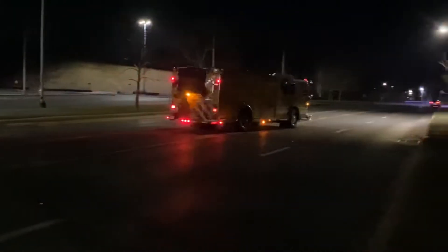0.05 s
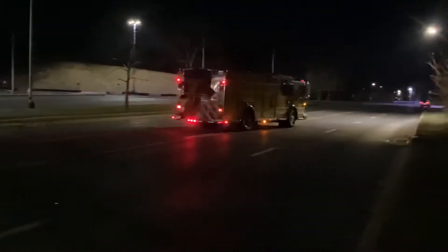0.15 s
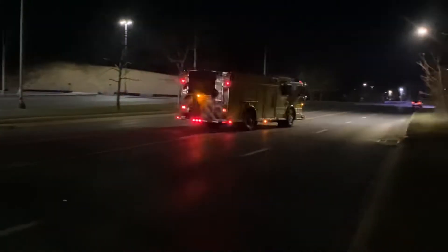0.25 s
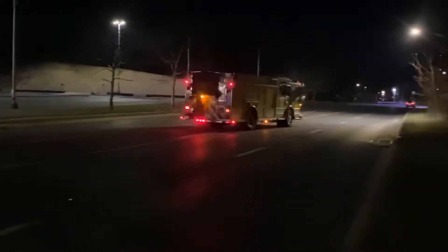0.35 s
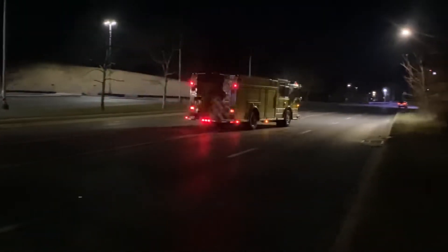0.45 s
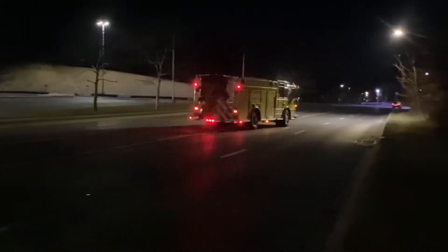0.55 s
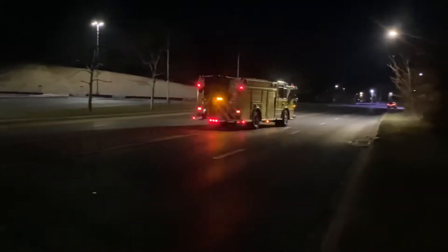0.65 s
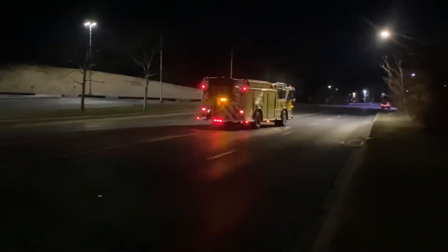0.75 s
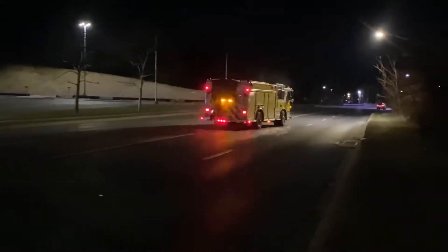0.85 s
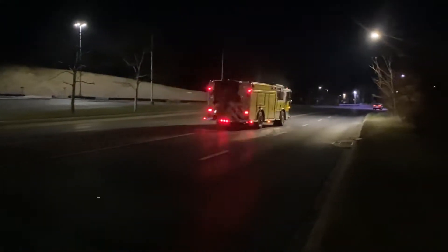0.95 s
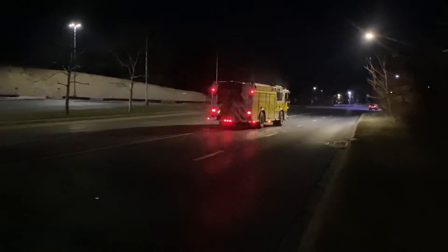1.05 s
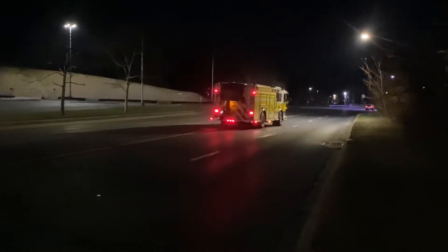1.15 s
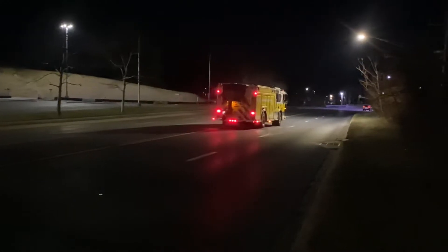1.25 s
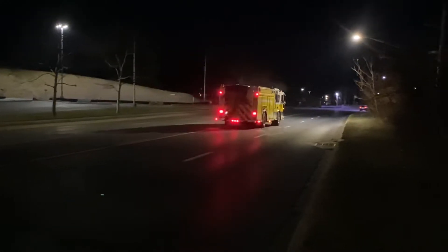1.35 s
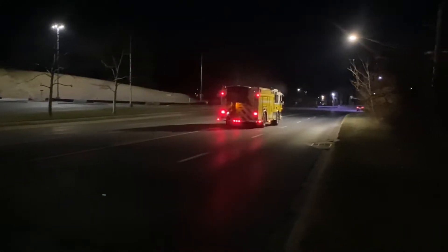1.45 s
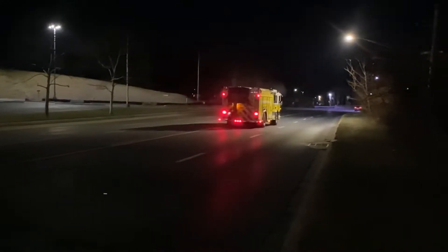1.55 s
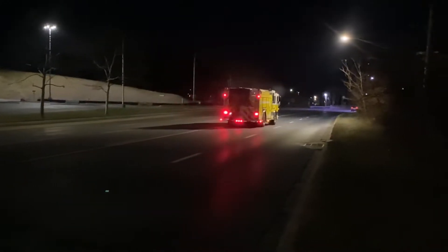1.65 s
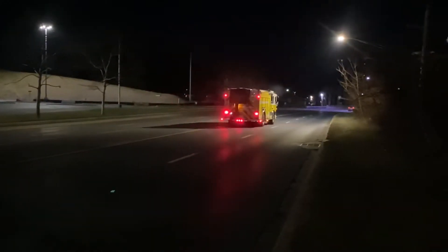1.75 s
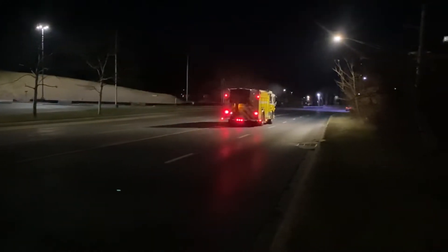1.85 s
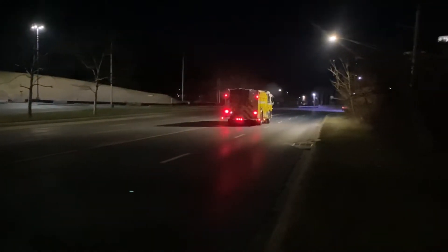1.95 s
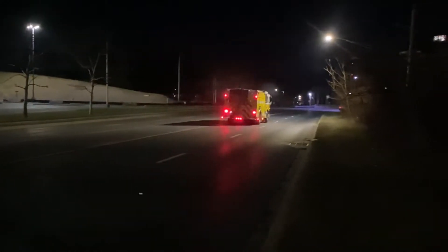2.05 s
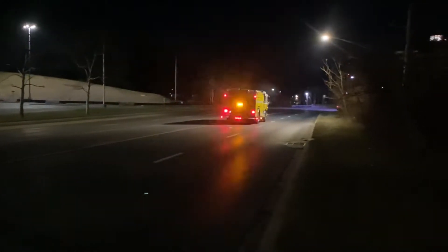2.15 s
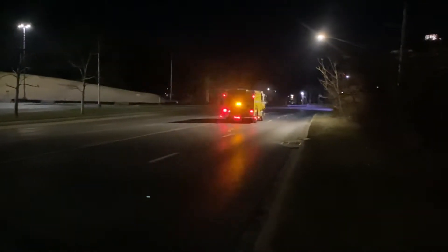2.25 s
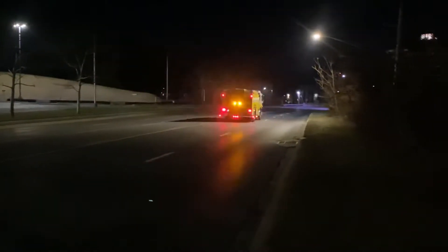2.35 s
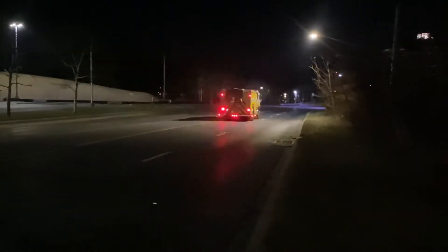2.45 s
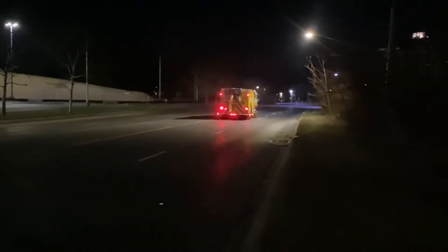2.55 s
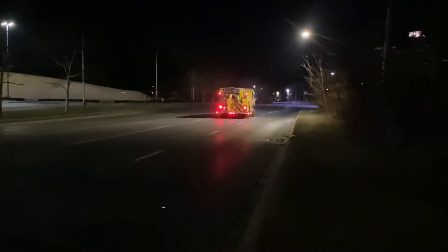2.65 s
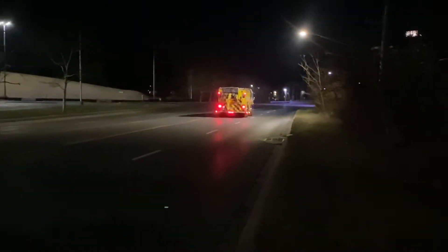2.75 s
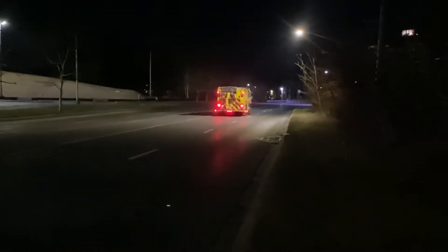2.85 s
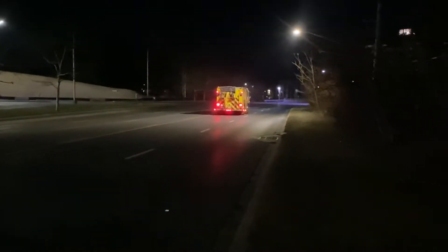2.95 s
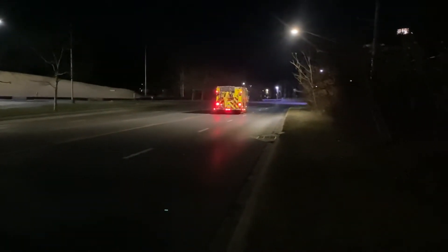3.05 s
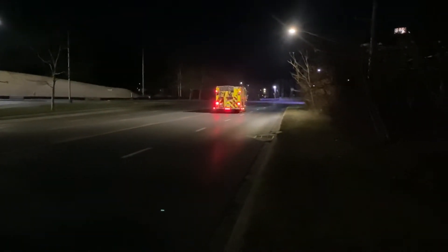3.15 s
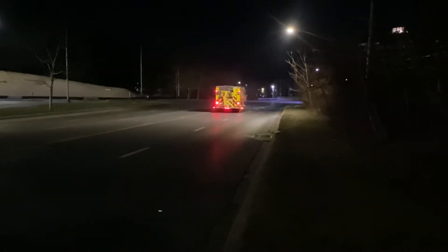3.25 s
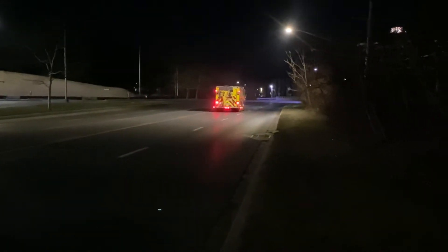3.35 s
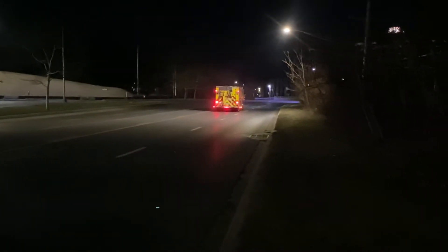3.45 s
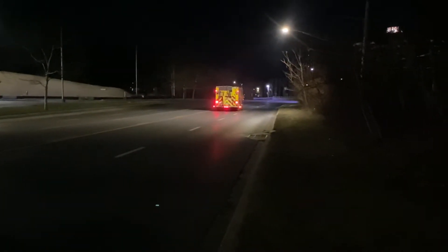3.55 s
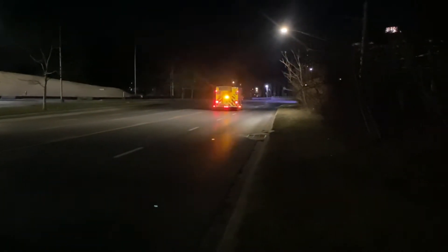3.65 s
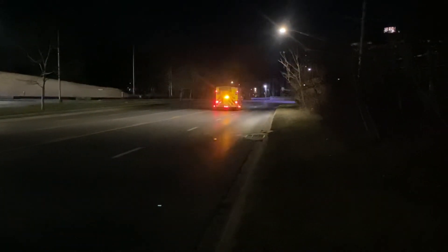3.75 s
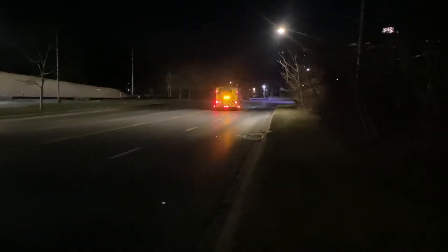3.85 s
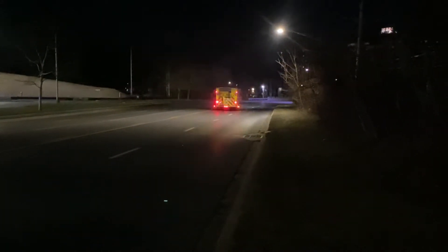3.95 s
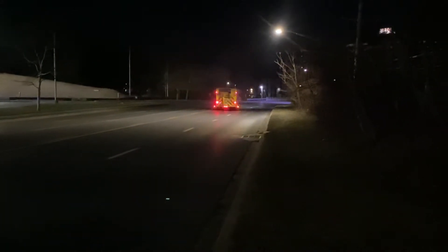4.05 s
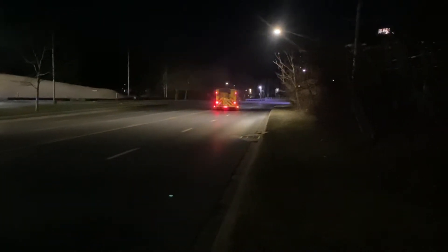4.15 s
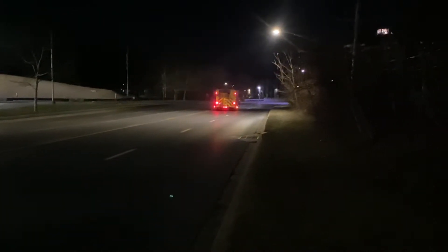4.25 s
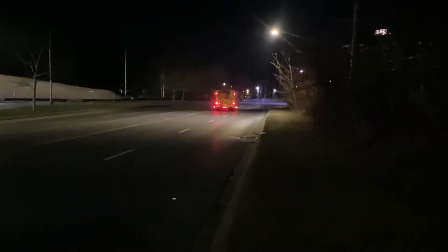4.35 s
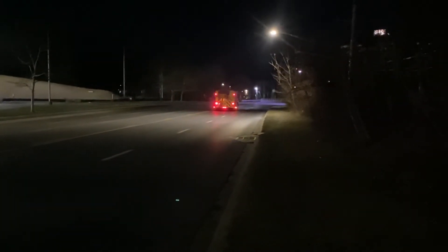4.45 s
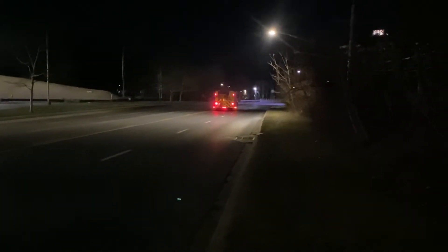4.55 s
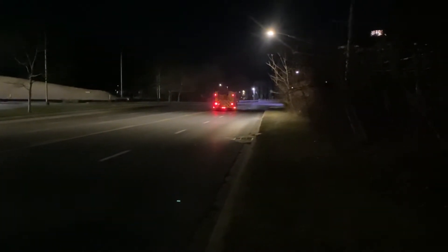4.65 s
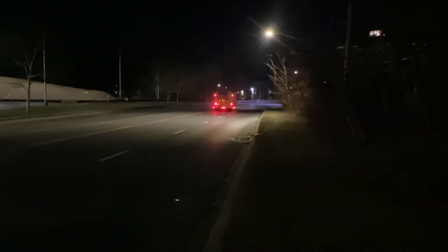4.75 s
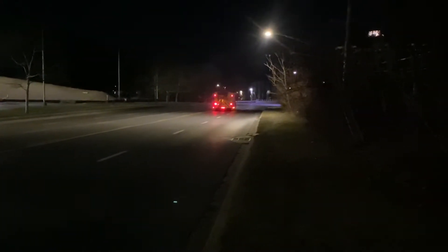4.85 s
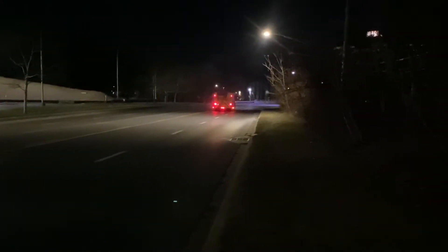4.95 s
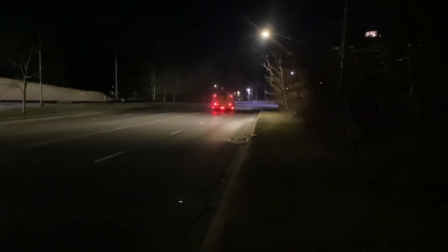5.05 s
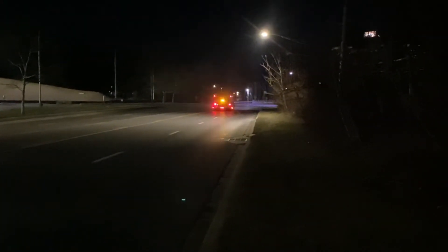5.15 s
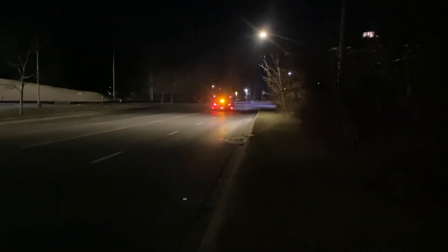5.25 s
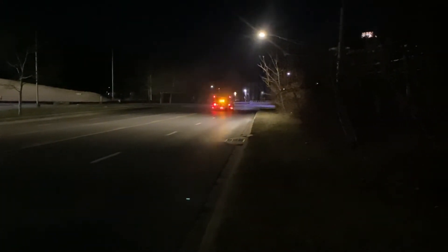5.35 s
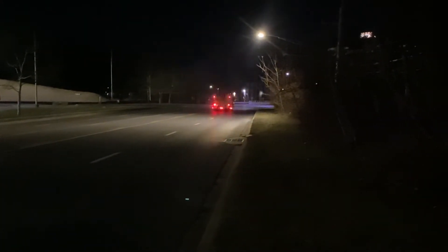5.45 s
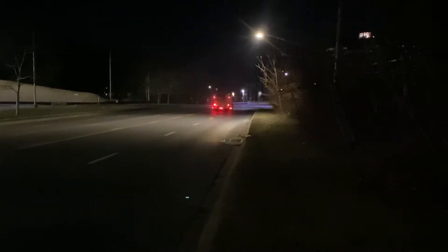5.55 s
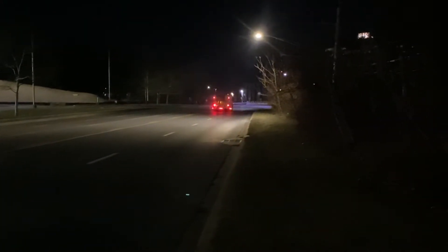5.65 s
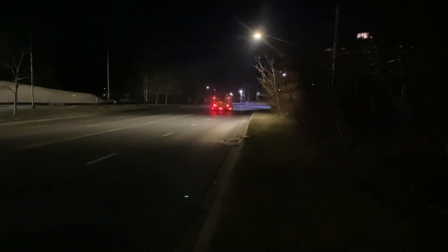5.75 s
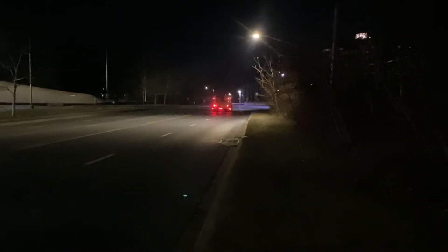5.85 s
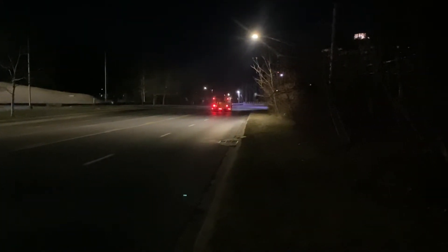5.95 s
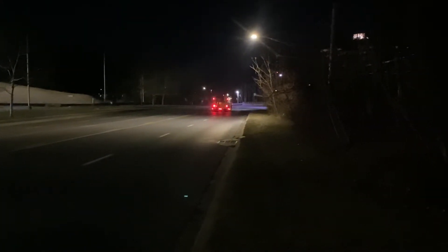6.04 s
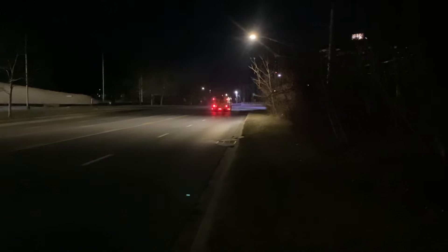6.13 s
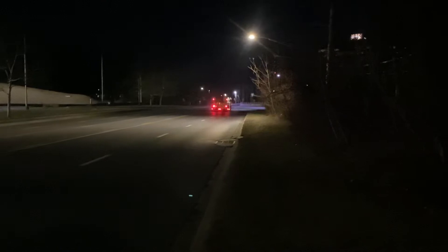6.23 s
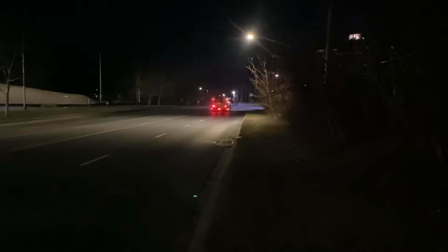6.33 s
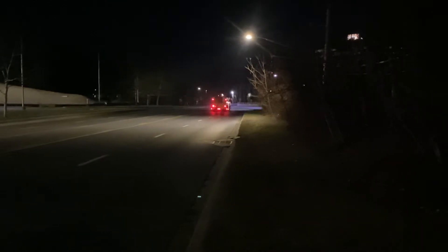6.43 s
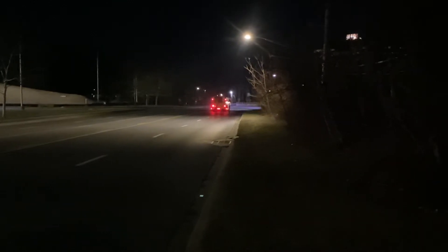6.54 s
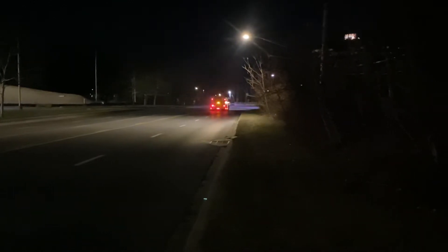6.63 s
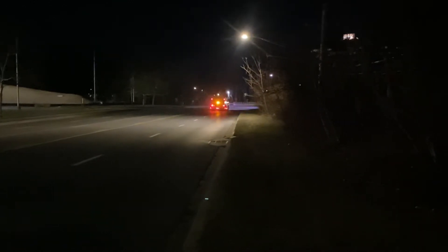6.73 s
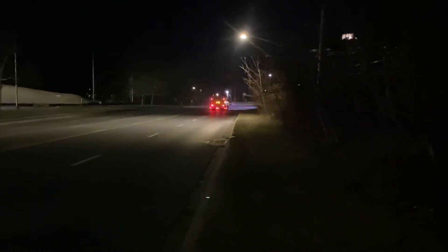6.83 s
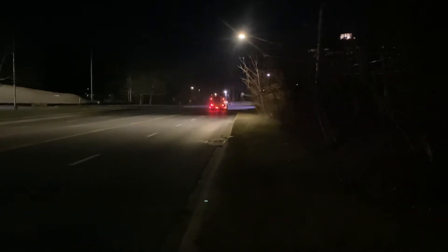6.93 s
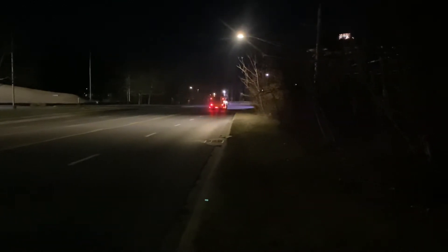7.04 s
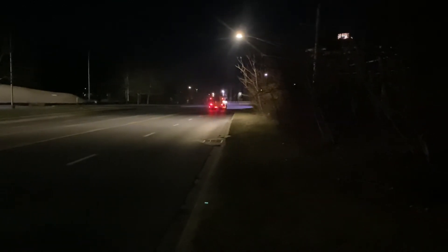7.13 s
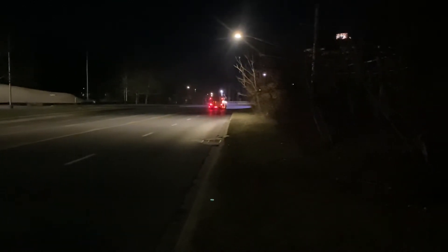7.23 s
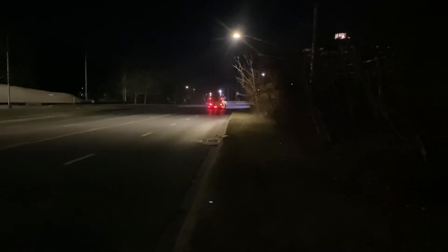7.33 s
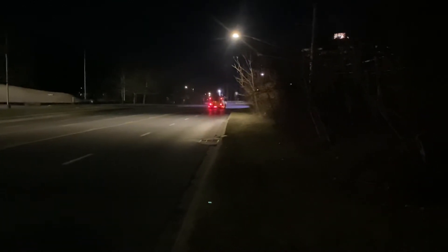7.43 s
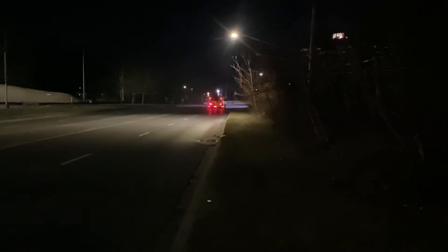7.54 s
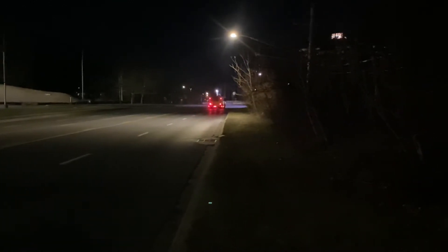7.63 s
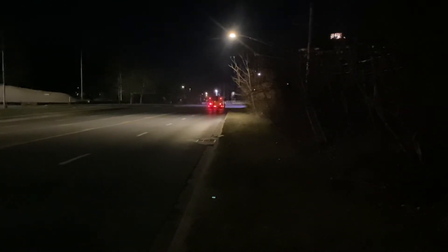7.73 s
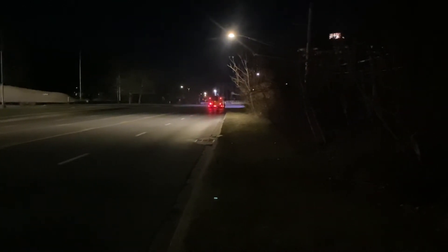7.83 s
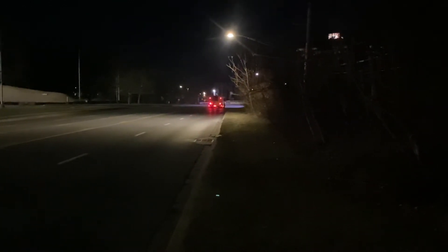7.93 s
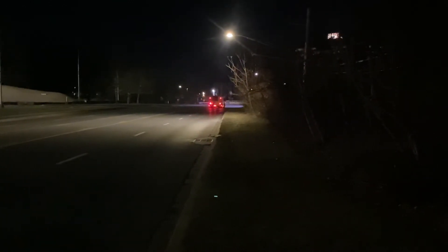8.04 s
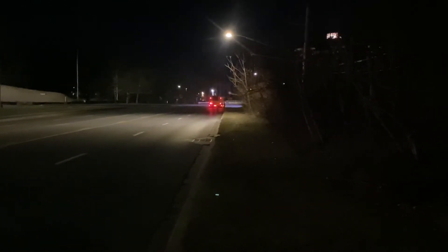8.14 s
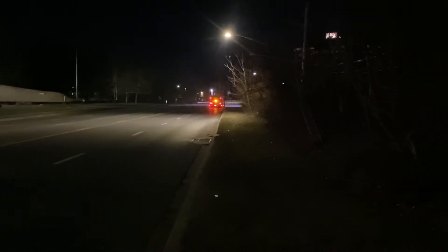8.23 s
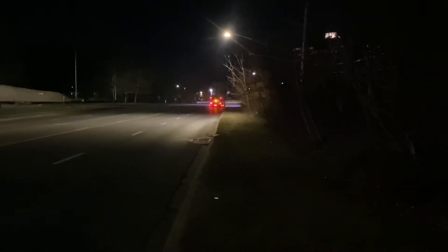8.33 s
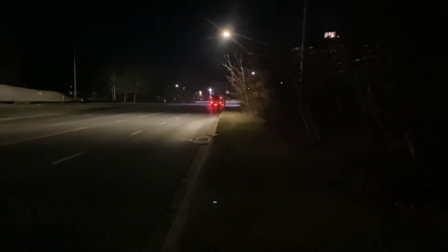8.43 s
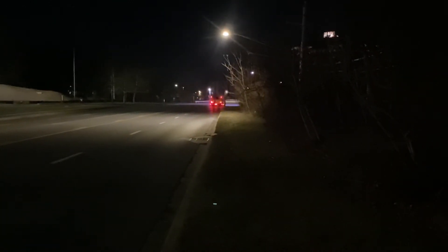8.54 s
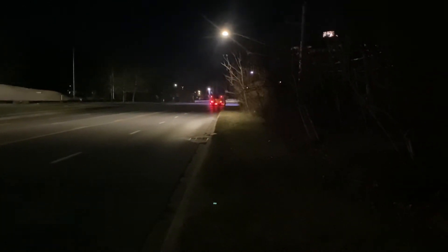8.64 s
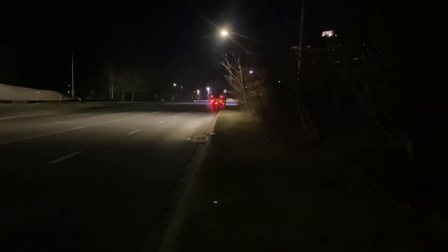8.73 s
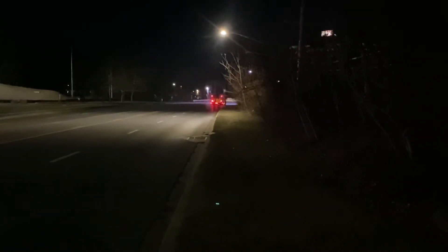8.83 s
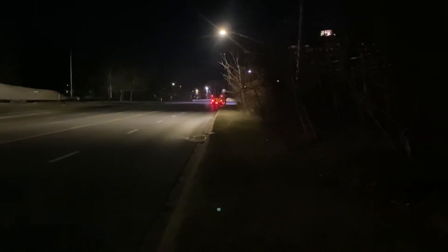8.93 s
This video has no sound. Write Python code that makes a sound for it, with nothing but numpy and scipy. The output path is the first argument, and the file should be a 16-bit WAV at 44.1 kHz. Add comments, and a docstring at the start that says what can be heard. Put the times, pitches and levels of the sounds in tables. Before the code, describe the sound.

Loud six-cylinder diesel exhaust accelerates away from a roadside listener, pitch dropping at two gear changes, thinning to faint rumble over quiet town noise.

```python
"""A six-cylinder diesel truck pulls away along an open road at night, changing gear twice.
Its exhaust sums a boom at the firing rate, growling cycle harmonics and filtered noise pulses (bark, rasp).
Reflections comb the pulses, and peaks beyond full scale clip. Noise bursts crack from the tail pipe;
narrow-band noise gives axle and turbocharger whines. Shaped noise gives town, hiss and a far car;
a sine hum comes in spells, and small nearby ticks are damped rings with noise."""
import sys
import numpy as np
from scipy import signal
from scipy.fft import rfft, irfft, next_fast_len
from scipy.io import wavfile
from scipy.ndimage import uniform_filter1d

SR = 44100
rng = np.random.default_rng(int(sys.argv[2]) if len(sys.argv) > 2 else 0)


def to_wav(sig):
    """Store sig (one row per channel, or 1-D mono) as 16-bit WAV at the path in sys.argv[1].

    Samples outside -1..1 are clipped; the rate is SR.
    """
    pcm = np.clip(np.atleast_2d(sig), -1, 1) * 32767
    pcm = np.round(pcm).astype(np.int16)
    wavfile.write(sys.argv[1], SR, pcm.T)  # frames by channels


N = 396459
T = np.arange(N) / SR


def gain_of(db):
    """Decibel law: 20 dB is a factor of ten in amplitude."""
    return 10 ** (np.asarray(db) / 20)


def evened(x):
    """Normalisation to unit rms over the whole length."""
    return x / np.sqrt(np.mean(x ** 2) + 1e-20)


def steady(x):
    """Envelope normalisation: divides out the slow level, so that a curve can set it."""
    return x / np.sqrt(uniform_filter1d(x ** 2, size=SR // 3, mode="reflect") + 1e-20)


def curves(rows):
    """Linear interpolation in time of every column of a table."""
    s, *columns = np.transpose(rows)
    return [np.interp(T, s, column) for column in columns]


def wander(per_s):
    """Random modulation: normal draws of unit spread, per_s of them a second, joined by lines."""
    points = rng.standard_normal(round(per_s * N / SR) + 2)
    return np.interp(T * per_s, np.arange(len(points)), points)


def colour(x, points):
    """Zero-phase filtering: the gain follows (f/Hz, level/dB) points on a log-frequency axis."""
    f, db = np.transpose(points)
    size = next_fast_len(N + SR)
    hz = np.fft.rfftfreq(size, 1 / SR)
    response_db = np.interp(np.log(hz + 1), np.log(f + 1), db, -120, -120)
    return irfft(rfft(x, size) * gain_of(response_db), size)[:N]


def resonate(x, hz, width):
    """Heterodyne resonator: shifts the curve hz down to zero, smooths, and shifts back."""
    turn = np.exp(2j * np.pi * np.cumsum(hz * np.ones(N)) / SR)
    r = np.exp(-np.pi * width / SR)
    smooth = signal.lfilter([1 - r], [1, -r], x / turn)
    return 2 * (turn * smooth).real


# engine speed before the flywheel rounds it: [t/s, firing rate f/Hz]
ENGINE_SPEED = [(0.0, 101.39), (0.38, 97.21), (0.76, 84.84), (1.01, 81.66), (1.33, 85.17), (2.54, 94.8),
                (3.05, 98.41), (3.3, 97.03), (3.8, 81.9), (4.05, 79.39), (5.16, 84.77), (6.3, 89.44),
                (6.6, 88.71), (6.86, 90.63), (7.26, 86.56), (8.1, 89.44), (8.78, 83.87), (8.99, 83.88)]
INERTIA_S = .15  # the flywheel rounds every change of speed


def speed():
    """Rotational inertia: firings per second, smoothed by a moving average."""
    return uniform_filter1d(curves(ENGINE_SPEED)[0], size=round(INERTIA_S * SR), mode="nearest")


FIRST_FIRING_S = .018


def turns():
    """Phase as the integral of frequency: firing steps counted from the first strong firing."""
    done = np.cumsum(speed()) / SR
    return done - np.interp(FIRST_FIRING_S, T, done)


# direction the tail pipe is heard from: [t/s, share (1 alongside, 0 behind)]
VIEWPOINT = [(.3, 1), (.75, 0)]


def alongside():
    """Source directivity: share of the sound taken from alongside rather than behind."""
    return curves(VIEWPOINT)[0]


# one row a cylinder: [place in the cycle/firing steps, growl level/dB, bark level/dB]
CYLINDER_FIRINGS = [(.24, 0, 0), (1.27, -1, -3.5), (2.3, -5, -7), (2.99, -6, -5), (4.25, -6, -7.5),
                    (4.99, -7, -5.5)]


def firings(jitter_s, spread_db):
    """Impulse train: one click a cylinder and cycle, each a little off in time and size."""
    place, _, bark_db = np.transpose(CYLINDER_FIRINGS)
    cycles = np.arange(-1, 140)[:, None]
    luck = rng.standard_normal((cycles.size * 6, 2))
    steps = (6 * cycles + place).ravel()
    at = (np.interp(steps, turns(), T, -1, -1) + jitter_s * luck[:, 0]) * SR
    size = gain_of(np.tile(bark_db, cycles.size) + spread_db * luck[:, 1])
    heard = (at > 0) & (at < N - 2)
    at, size = at[heard], size[heard]
    # a click between two samples is shared by both
    whole, part, out = at.astype(int), at % 1, np.zeros(N)
    np.add.at(out, whole, size * (1 - part))
    np.add.at(out, whole + 1, size * part)
    return out


def puffs(clicks, decay_s, base):
    """Turbulence as modulated noise: it flares at each firing and decays exponentially."""
    r = np.exp(-1 / (decay_s * SR))
    flare = evened(signal.lfilter([1], [1, -r], clicks))
    return evened((base + flare) * rng.standard_normal(N))


# reflections off chassis and kerb: [delay t/s, strength/1 (full alongside)]
NEAR_REFLECTIONS = [(.0027, 0.19), (.0049, 0.044), (.0083, 0.34), (.0136, -0.11)]
BOUNCE_BEHIND = .4  # share of the reflections left once the truck has turned its back


def bounce(x):
    """Early reflections: each pulse returns a few times from nearby surfaces."""
    share = BOUNCE_BEHIND + (1 - BOUNCE_BEHIND) * alongside()
    return x + share * sum(strength * np.roll(x, round(s * SR)) for s, strength in NEAR_REFLECTIONS)


# road echo, its paths growing alike with distance:
# [t/s, comb spacing f/Hz, strength on bark/1, strength on rasp and cracks/1]
ROAD_COMB = [(0, 750, .75, .45), (.4, 890, .6, .4), (1, 1040, .2, .4), (1.5, 1210, .15, .6),
             (1.9, 1330, .15, .65), (2.3, 1420, .1, .6), (2.9, 1550, .1, .4), (3.3, 1700, .1, .45),
             (4, 1900, 0, .15), (9, 3400, 0, 0)]


def road_echo(x, column):
    """Comb interference: adds the copy that bounces off the road; its rough face scatters treble."""
    spacing_hz, *strength = curves(ROAD_COMB)
    dull = signal.filtfilt(*signal.butter(1, 6000, fs=SR), x)
    delayed = np.interp(np.arange(N) - SR / spacing_hz, np.arange(N), dull)
    return x + strength[column] * delayed


def shimmer(x, depth_db):
    """Scattering by moving air: random patches of the spectrum rise and drop."""
    z = signal.stft(x, nperseg=256)[2]
    patches = uniform_filter1d(rng.standard_normal(z.shape), size=4, axis=0)
    patches = evened(uniform_filter1d(patches, size=36, axis=1))
    return signal.istft(z * gain_of(depth_db * patches), nperseg=256)[1][:N]


def boom():
    """Fundamental of the firing rate: one sinusoid locked to the engine's phase."""
    return np.sqrt(2) * np.cos(2 * np.pi * (turns() + .06))


# strength of a cycle multiple by its remainder, 0 to 5 sixths of the firing rate: [level/dB]
ORDER_LEVELS = [4.5, -9.5, -5, -1.5, -1.5, -4]
# silencer colour on the growl lines heard alongside: [f/Hz, level/dB]
SILENCER_ALONGSIDE = [(40, -39), (50, -26), (66, -15.5), (90, -21), (148, -5.5), (246, -2.5), (328, -9.5),
                      (394, -21), (443, -33), (525, -16), (656, -35), (750, -39)]
# silencer colour on the growl lines heard from behind: [f/Hz, level/dB]
SILENCER_BEHIND = [(44, -41), (58, -13.5), (75, -24.5), (100, -8), (135, -15), (200, -10.5), (228, -9.5),
                   (252, -5.5), (295, -11), (345, -8), (400, -13), (465, -21), (580, -20.5), (700, -43)]
HALFWAY_DB_PER_ORDER, HALFWAY_PIVOT = -.45, 21  # the multiples halfway between fade as they climb


def growl_lines():
    """Fourier series of the engine cycle: uneven firings set how the lines line up into pulses."""
    place, db, _ = np.transpose(CYLINDER_FIRINGS)
    count = len(place)
    cycle, beside, out = 2 * np.pi * (turns() - .07) / 6, alongside(), np.zeros(N)
    for order in range(3, 41):
        if order == count:
            continue  # the boom plays the firing rate itself
        pulses = gain_of(db) * np.exp(-2j * np.pi * order * place / count)
        start = np.angle(np.sum(pulses)) + .6
        level_db = ORDER_LEVELS[order % count] + 2.1 * wander(per_s=4)
        if order % count == count / 2:
            level_db += HALFWAY_DB_PER_ORDER * (order - HALFWAY_PIVOT)
        phase = order * cycle + start + .01 * order * wander(per_s=9)
        out += gain_of(level_db) * np.cos(phase)
    near, far = colour(out, SILENCER_ALONGSIDE), colour(out, SILENCER_BEHIND)
    return steady(beside * near + (1 - beside) * far)


# colour of the turbulence in the silencer: [f/Hz, relative level/dB]
SILENCER_TURBULENCE = [(26, -35), (45, -23.5), (75, -18.5), (129, -6), (232, 1.5), (284, -8.5), (328, 1),
                       (520, -9), (680, -43.5), (1140, -120)]


def growl(clicks):
    """Harmonic and turbulent sound superposed: cycle lines with a share of silencer noise."""
    turbulence = colour(puffs(clicks, .005, 1.3), SILENCER_TURBULENCE)
    return growl_lines() + .3 * evened(turbulence)


# colour of the tail pipe: [f/Hz, relative level/dB]
TAIL_PIPE = [(200, -20), (330, -3.5), (480, 7), (620, 7.5), (800, 4.5), (1000, 2), (1250, -8.5),
             (1600, -20.5), (2500, -36)]


def bark(clicks, rough):
    """Pipe-filtered pulses: clean clicks and turbulence mix at constant power, then reflect."""
    pulses = rough * puffs(clicks, .006, 2.2) + np.sqrt(1 - rough ** 2) * evened(clicks)
    return steady(road_echo(bounce(colour(pulses, TAIL_PIPE)), column=0))


# colour of the gas jet: [f/Hz, relative level/dB]
GAS_JET = [(590, -26), (1000, -4), (1400, -8), (2250, -15), (3210, -24.5), (3820, -25), (5890, -31.5),
           (6800, -36.5), (8910, -51), (10000, -53.5), (13000, -76.5), (22000, -120)]


def rasp(clicks, rough):
    """Jet noise: broadband turbulence pulsed by the firings, combed by the road and the air."""
    jet = puffs(clicks, .002, .6 + 3 * rough) + .5 * (1 - rough) * evened(clicks)
    return steady(shimmer(road_echo(colour(jet, GAS_JET), column=1), depth_db=2.5))


# reference for all exhaust layers as the truck draws away and finally eases off: [t/s, level/dB]
EXHAUST_LEVEL = [(0, -16), (.3, -15), (.6, -15.5), (1, -17), (1.45, -17), (2, -20), (2.7, -22), (3.3, -24),
                 (3.8, -25), (4.2, -27.5), (5.1, -27.5), (5.9, -31), (6.4, -34), (6.8, -41), (7.2, -46),
                 (8, -53.5), (8.6, -51), (8.99, -68)]
# share of turbulence in the pulses, before the swells clear them: [t/s, share/1]
ROUGHNESS = [(0, 0.5), (.3, 0.57), (.55, 1), (2.4, 0.89), (3.3, 0.69), (4.2, 0.99), (6.2, 1), (7, 0.9),
             (8.99, 0.6)]
# moments when the jet swells and the pulses clear, or (negative) the reverse:
# [t/s, rasp level/dB, half length t/s]
JET_SWELLS = [(0.193, 8, 0.2), (0.951, 4.5, 0.13), (1.44, 3.5, 0.065), (1.675, 1.5, .1), (2.095, 3.5, 0.12),
              (1.913, 4.5, 0.12), (2.328, 4.5, 0.075), (2.745, 2, 0.15), (3.08, -1, 0.09),
              (3.37, 0.5, 0.14), (3.738, 3, 0.29), (4.945, 0.5, .14), (6.3, -4, 0.058)]
# far down the road the boom swells and drops against the rest: [t/s, level/dB]
DISTANT_BOOM = [(5.4, 0), (6.1, 5), (6.45, 12), (6.75, 14), (6.95, 7), (7.22, 15), (7.4, -9), (7.75, -2),
                (8, 10), (8.4, 17), (8.62, 22), (8.8, 13), (8.99, 16)]
REV_HZ = 90  # firing rate at which BARK_DB and RASP_DB hold
BARK_DB, BARK_DB_PER_HZ, BARK_DB_PER_S = -8, 0.3949, 0.76  # higher revs bark harder
RASP_DB, RASP_DB_PER_HZ, RASP_DB_PER_S = -15.5, 0.2451, -0.35  # the air dulls the jet with distance
ALONGSIDE_BOOM_DB, ALONGSIDE_BARK_DB, ALONGSIDE_RASP_DB = 3, 5, -1  # facing the open tail pipe
CLEARING_PER_DB, SWELL_ON_BARK = 0.04, 0.38
# the boom blooms as the firing rate nears the pipe's note
PIPE_HZ, PIPE_WIDTH_HZ, BOOM_DB, BLOOM_DB = 98, 7.5, -12, 10.5
# the driver eases off and the pipe quietens
EASE_S, EASE_LENGTH_S = 6.6, 2
EASED_GROWL_DB, EASED_BARK_DB, EASED_RASP_DB = -4, -1.5, -12


def controls():
    """Radiated level by load, resonance and directivity: four layer levels in dB, and roughness."""
    level_db, rate, beside = curves(EXHAUST_LEVEL)[0], speed(), alongside()
    revs = rate - REV_HZ
    eased = np.clip((T - EASE_S) / EASE_LENGTH_S, 0, 1)
    swell_db = sum(db * np.clip(1 - abs(T - s) / half, 0, 1) for s, db, half in JET_SWELLS)

    bloom_db = BLOOM_DB * np.exp(-((rate - PIPE_HZ) / PIPE_WIDTH_HZ) ** 2)
    boom_db = BOOM_DB + bloom_db + ALONGSIDE_BOOM_DB * beside + curves(DISTANT_BOOM)[0]
    growl_db = EASED_GROWL_DB * eased
    bark_db = BARK_DB + BARK_DB_PER_HZ * revs + BARK_DB_PER_S * T
    bark_db += ALONGSIDE_BARK_DB * beside + SWELL_ON_BARK * swell_db + EASED_BARK_DB * eased
    rasp_db = RASP_DB + RASP_DB_PER_HZ * revs + RASP_DB_PER_S * T
    rasp_db += ALONGSIDE_RASP_DB * beside + swell_db + EASED_RASP_DB * eased

    rough = np.clip(curves(ROUGHNESS)[0] - CLEARING_PER_DB * swell_db, 0, 1)
    return level_db + boom_db, level_db + growl_db, level_db + bark_db, level_db + rasp_db, rough


def exhaust():
    """Superposition of boom, growl, bark and rasp; one train of firings drives the noisy layers."""
    boom_db, growl_db, bark_db, rasp_db, rough = controls()
    clicks = firings(jitter_s=.00012, spread_db=1.3)
    low = gain_of(boom_db) * boom() + gain_of(growl_db) * growl(clicks)
    high = gain_of(bark_db) * bark(clicks, rough) + gain_of(rasp_db) * rasp(clicks, rough)
    return low + high


# turbocharger whistle: [t/s, f/Hz, mean level/dB]
TURBO_WHISTLE = [(0, 10300, -92), (.6, 10000, -84), (1, 9750, -80), (1.5, 9750, -81), (2.3, 10300, -86),
                 (3.2, 10900, -93), (4, 10900, -100)]


def turbo():
    """Narrow-band noise: two resonators in series give a fuzzy whistle with a wandering level."""
    hz, db = curves(TURBO_WHISTLE)
    whistle = resonate(resonate(rng.standard_normal(N), hz, 300), hz, 300)
    return gain_of(db + 4 * wander(per_s=9.1)) * evened(whistle)


# colour of distant traffic and hiss: [f/Hz, relative level/dB]
TOWN_COLOUR = [(12, -36), (20, -6.5), (77, 0), (146, -6.5), (198, -3), (337, -11.5), (485, -12.5),
               (873, -11), (1030, -16), (1440, -18), (2140, -27), (3840, -42.5), (6910, -47.5),
               (14700, -47.5), (16000, -51)]
# tyre roar as a far car draws nearer: [t/s, level/dB]
TYRE_ROAR = [(6.5, -83), (7.5, -82), (8, -77), (8.5, -63), (8.99, -55.5)]
TOWN_DB = -45
WHINE_HZ, WHINE_DB = 10150, -89  # a thin steady whine


def town():
    """Shaped random noise: traffic and hiss, tyre roar, and a whine from a narrow resonance."""
    wash = evened(colour(rng.standard_normal(N), TOWN_COLOUR))
    roar = colour(rng.standard_normal(N), [(400, -52), (850, -1), (1100, -9.0), (2000, -9.5), (3500, -31)])
    whine = evened(resonate(rng.standard_normal(N), WHINE_HZ, 25))
    car = gain_of(curves(TYRE_ROAR)[0]) * evened(roar)
    return gain_of(TOWN_DB) * wash + car + gain_of(WHINE_DB) * whine


# louder cracks of the exhaust: [t/s, flare peak before colouring level/dB]
EXHAUST_CRACKS = [(0.017, -29), (0.078, -22.5), (0.139, -10), (0.2002, -16), (0.262, -19), (0.32, -18),
                  (0.383, -16.5), (0.448, -33.5), (0.5766, -25), (0.7229, -31.5), (0.7938, -39.5),
                  (0.852, -26), (0.9165, -21.5), (1.0233, -26.5), (1.0823, -33.5), (1.1442, -28),
                  (1.2128, -25), (1.4248, -20), (1.508, -21), (1.794, -25.5), (1.9064, -21.5),
                  (2.178, -27.5), (2.2322, -28), (2.2973, -22), (2.708, -33), (2.7687, -37),
                  (2.8344, -31.5), (2.865, -27.5), (2.938, -49), (2.9887, -48), (3.058, -52), (3.1106, -34),
                  (3.174, -31.5), (4.7967, -51)]


def cracks():
    """Impulsive jet noise: short bright bursts that decay exponentially at the tail pipe."""
    flare = np.zeros(N)
    s, db = np.transpose(EXHAUST_CRACKS)
    flare[np.round(s * SR).astype(int)] = gain_of(db)
    flare = signal.lfilter([1], [1, -np.exp(-1 / (0.0043 * SR))], flare)
    bright = [(900, -33.0), (1700, 10.5), (2500, 7), (3500, -6.5), (5000, -12.0), (8000, -19.0)]
    return road_echo(colour(flare * rng.standard_normal(N), bright), column=1)


# axle gears, climbing with road speed: [t/s, f/Hz, level/dB]
AXLE_GEARS = [(.4, 733, -52), (.7, 761, -37), (1.3, 776, -34), (2, 789, -38), (2.8, 820, -36),
              (3.3, 854, -39), (3.8, 876, -43), (4.6, 905, -85)]


def axle():
    """Gear whine as narrow-band noise: a blurred tone from the drive line."""
    hz, db = curves(AXLE_GEARS)
    return gain_of(db) * evened(resonate(resonate(rng.standard_normal(N), hz, 45), hz, 45))


# ticks close to the microphone: [t/s, ring level before decay and band-pass/dB, ring f/Hz]
NEAR_TICKS = [(1.7494, -39, 4930), (1.863, -33, 5000), (3.699, -49, 6400), (3.9016, -38, 6000),
              (4.0228, -41, 7140), (4.0344, -36, 5100), (4.544, -38, 5560), (4.5524, -33, 5200),
              (5.641, -44, 5980), (5.8207, -40, 5330), (5.9573, -38, 5800), (5.9657, -34.5, 5240),
              (6.149, -46, 5260), (6.3565, -45, 5030), (7.1766, -52, 8300), (7.481, -46, 6370),
              (7.481, -33.5, 6200), (7.4844, -38, 5330), (8.276, -40, 9400), (8.302, -46, 6940)]


def ticks():
    """Damped oscillation: tiny dry snaps, a short ring plus a wide crack."""
    out, t = np.zeros(N + 200), np.arange(200) / SR
    for s, db, hz in NEAR_TICKS:
        ring = np.sin(2 * np.pi * hz * t) * np.exp(-t / 0.00026)
        crack = rng.standard_normal(200) * np.exp(-t / 0.0019)
        out[round(s * SR):][:200] += gain_of(db) * (ring + 0.32 * crack)
    band = signal.butter(2, [4500, 11000], "bandpass", fs=SR, output="sos")
    return signal.sosfilt(band, out[:N])


# twice the firing rate, left over in the distance: [t/s, level/dB]
SECOND_ORDER = [(6.7, -57), (7.2, -46), (7.6, -43.5), (8, -54), (8.25, -66), (8.6, -70)]
# spells of hum: [start t/s, end t/s, mean level/dB]
HUM_SPELLS = [(6.747, 7.013, -49), (7.117, 7.423, -50), (7.597, 8.233, -49.5), (8.616, 8.746, -50),
              (8.807, 8.983, -47)]
HUM_HZ, HUM_FADE_S = 201, .04


def far_tones():
    """Pure tones: the second firing harmonic fading in late, and a hum that comes in spells."""
    fade = np.clip((T - SECOND_ORDER[0][0]) / 0.2, 0, 1)
    second = np.sqrt(2) * np.cos(4 * np.pi * turns())
    hum = np.sqrt(2) * np.cos(2 * np.pi * HUM_HZ * T + wander(per_s=6))
    hum = hum * gain_of(2.5 * wander(per_s=8))
    spells = sum(gain_of(db) * np.clip(np.minimum(T - start, end - T) / HUM_FADE_S, 0, 1)
                 for start, end, db in HUM_SPELLS)
    return fade * gain_of(curves(SECOND_ORDER)[0]) * second + spells * hum


def scene():
    """Linear superposition of all sources on one channel."""
    return (exhaust() + turbo() + town() + cracks() + axle() + ticks() + far_tones())[None]


EDGE_HZ = 15850  # upper band limit


def record(dry):
    """Overload and band limiting: the input clips at full scale, then a low-pass cuts the top."""
    clipped = np.clip(dry, -1, 1)
    low_pass = signal.firwin(511, EDGE_HZ, window=("kaiser", 9), fs=SR)
    return signal.oaconvolve(clipped, low_pass[None], "same")


dry = scene()
out = record(dry)
to_wav(out)
```